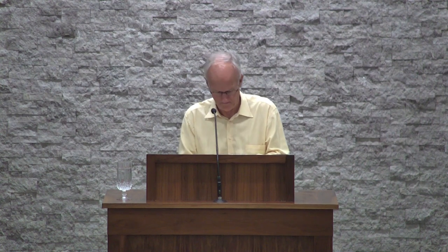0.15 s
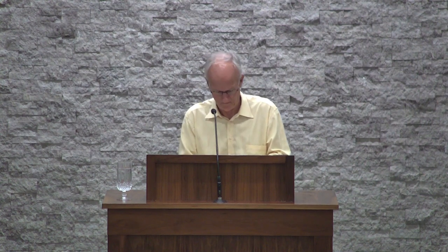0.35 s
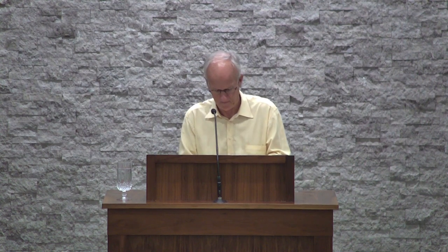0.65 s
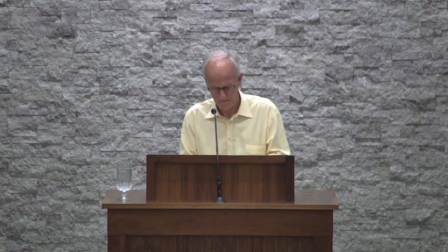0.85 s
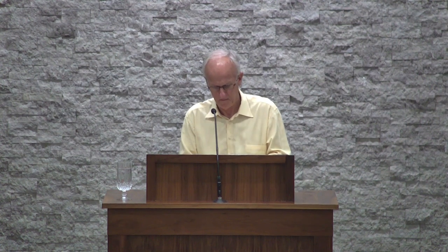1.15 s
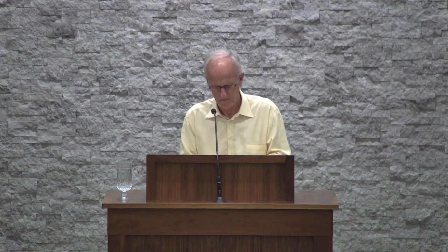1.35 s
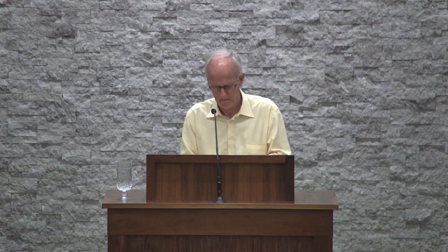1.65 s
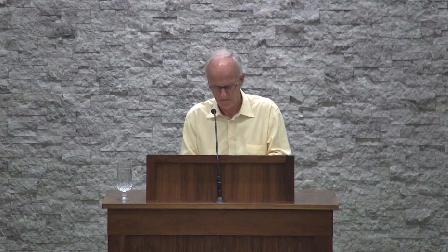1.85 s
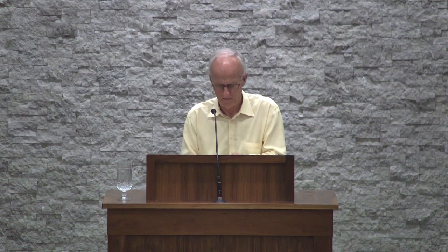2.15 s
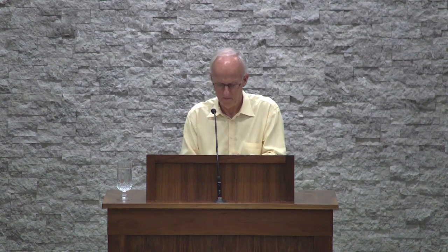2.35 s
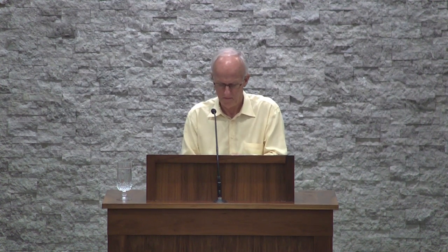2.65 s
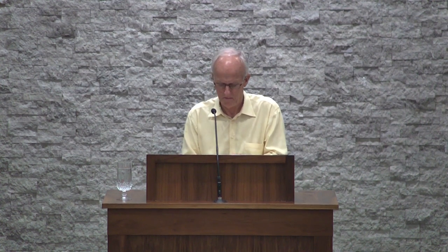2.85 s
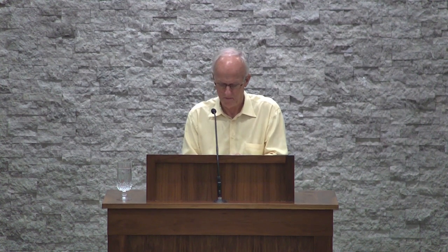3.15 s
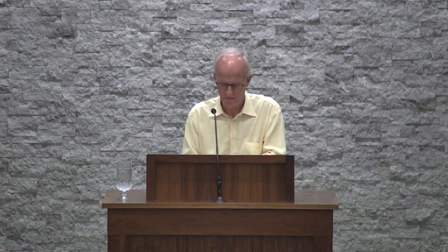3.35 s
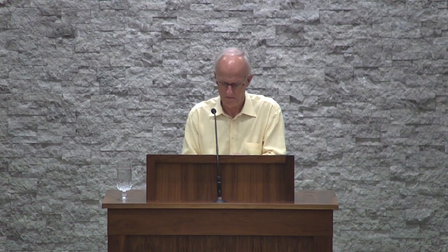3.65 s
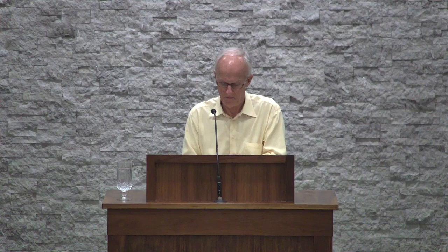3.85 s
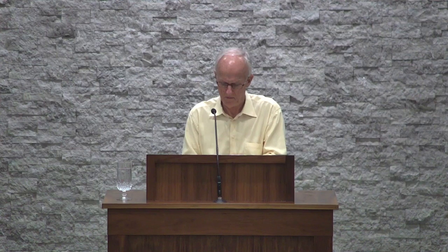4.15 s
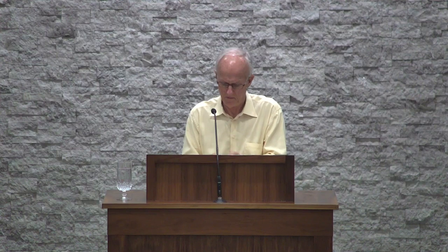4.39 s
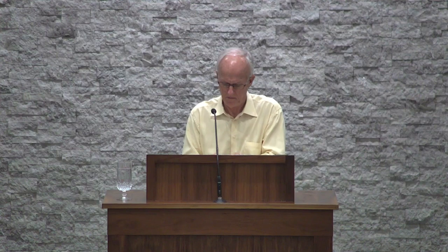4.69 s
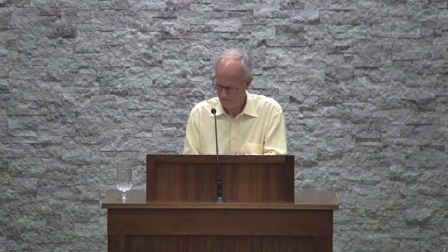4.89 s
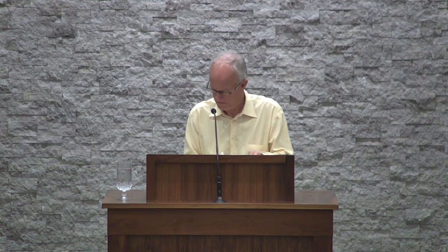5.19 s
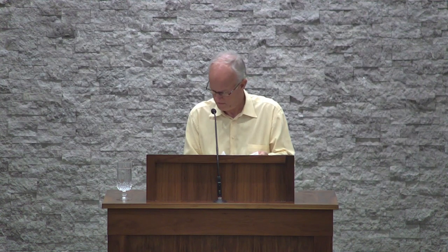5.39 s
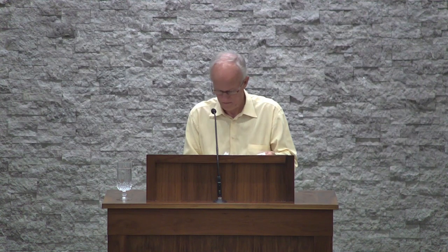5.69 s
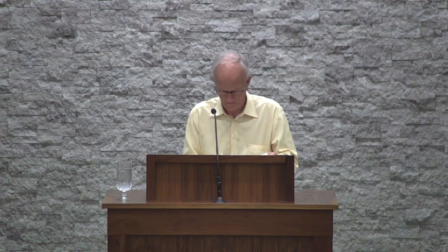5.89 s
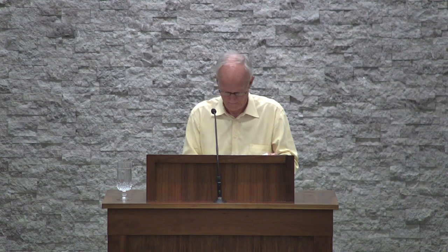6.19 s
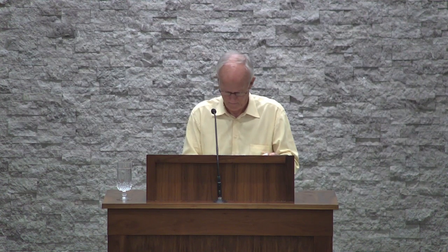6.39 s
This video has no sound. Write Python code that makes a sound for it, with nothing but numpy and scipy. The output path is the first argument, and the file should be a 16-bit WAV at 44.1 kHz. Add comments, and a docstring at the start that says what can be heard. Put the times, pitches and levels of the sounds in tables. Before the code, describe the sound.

Close to the microphone, thin book pages are leafed through on a wooden lectern in a large, quiet hall. From 0 to 0.8 s there are only light rustles and a few isolated snaps, at about 0.2 and 0.6 s. A sharp cluster of crackles with a papery slap comes at 0.9 s, followed by softer crinkling. From about 1.7 s the handling grows busier, with dense crunches and swishes at 2.2 to 2.6 s, then quick irregular snaps through 3 to 3.6 s. After a slightly calmer moment, bright sharp cracks stand out at 4.2, 4.5 and 4.9 s, and a fuller snap with a low thud at 5.0 s. Crinkling continues until about 5.8 s, then fades; a small rustle at 6.1 s and a faint tick at 6.5 s remain. Very faint ventilation rumble, hiss and hum continue throughout, with a thin short room tail.

```python
"""Leafing through thin pages

A book on a wooden lectern in a large hall, close to the microphone. Creases buckle with snaps and
crunches (bursts of micro-cracks); sheets rustle (fluttering, crackling noise through resonances).
Pages slap the book with low thuds (a push and a puff of noise, resonated). A near surface returns a
weak echo, ahead of a thin short tail. Shaped noise gives the ventilation's rumble and faint hiss,
and two wavering sines its hum."""
import sys
import numpy as np
from scipy import signal
from scipy.fft import rfft, irfft, next_fast_len
from scipy.io import wavfile

SR = 44100
rng = np.random.default_rng(int(sys.argv[2]) if len(sys.argv) > 2 else 0)


def master(y):
    """Save y as 16-bit WAV."""
    cut = np.clip(np.atleast_2d(y).T, -1, 1)
    pcm = np.round(cut * 32767)  # scale
    wavfile.write(sys.argv[1], SR, pcm.astype(np.int16))


N = 287950   # length in samples


def from_db(db):
    """Decibels to gain."""
    return 10 ** (np.asarray(db) / 20)


def rms_one(x):
    """Scale to rms 1."""
    return x / np.sqrt(np.mean(x ** 2) + 1e-20)


def coloured(x, spectrum):
    """Give x the spectrum of (f/Hz, level/dB) points, nearly silent outside them; rms 1."""
    size = next_fast_len(len(x))
    hz, level_db = np.transpose(spectrum)
    log_hz = np.log(np.arange(size // 2 + 1) * SR / size + 1)   # + 1 avoids log(0)
    gain = from_db(np.interp(log_hz, np.log(hz), level_db, left=-90, right=-90))
    shaped = irfft(rfft(x, size) * gain, size)
    return rms_one(shaped[:len(x)])


def drift(corner_hz):
    """Slow chance: noise through a double one-pole low-pass; spread 1."""
    r = np.exp(-2 * np.pi * corner_hz / SR)
    noise = rng.standard_normal(N + SR)
    slow = signal.lfilter([1], [1, -2 * r, r * r], noise)
    return rms_one(slow[SR:])   # the first second lets the filter settle


def resonate(x, hz, width_hz):
    """Two-pole resonance, gain 1 on top."""
    r = np.exp(-np.pi * width_hz / SR)
    zeros = np.array([1, 0, -1]) * (1 - r * r) / 2
    poles = [1, -2 * r * np.cos(2 * np.pi * hz / SR), r * r]
    return signal.lfilter(zeros, poles, x)


def edge(x, hz, kind, order):
    """Butterworth high- or low-pass."""
    return signal.sosfilt(signal.butter(order, hz, kind, fs=SR, output="sos"), x)


# spectrum of the background rumble and hiss, closed above 16 kHz: (f/Hz, relative level per Hz/dB)
BACKGROUND_SPECTRUM = [(15, -52), (42, -19.5), (58, -11.5), (80, -18.5), (110, -3.5), (150, -6.5),
                       (230, -3), (300, -10.5), (500, -12), (1200, -20), (2700, -28), (11600, -38.5),
                       (15600, -27), (16100, -45)]
# steady hum tones: (f/Hz, mean level/dB rms, width at half height/Hz)
HUM_TONES = [(188.7, -68, 2), (574.6, -79, 2.49)]
BACKGROUND_DB = -68.5   # rms


def ventilation():
    """Broad rumble and hiss, with narrow hum tones whose pitch and level waver a little."""
    out = from_db(BACKGROUND_DB) * coloured(rng.standard_normal(N), BACKGROUND_SPECTRUM)
    t = np.arange(N) / SR
    for hz, level_db, width_hz in HUM_TONES:
        offset_hz = 0.425 * width_hz * drift(3.01)   # 0.425: spread from width at half height
        wander = 2 * np.pi * np.cumsum(offset_hz) / SR
        level = from_db(level_db + 0.72 * drift(1.1))
        out += level * np.sqrt(2) * np.sin(2 * np.pi * hz * t + wander)
    return out


# sheets kept moving under the fingers: (t/s, rustle level/dB rms)
HANDLING_LEVELS = [(0, -77), (.09, -72), (.32, -65), (.48, -71), (.73, -69.5), (.8, -58), (1.1, -62),
                   (1.22, -70.5), (1.735, -76), (1.75, -54.5), (2.09, -63.5), (2.5, -59.5), (3.34, -63),
                   (3.68, -60.5), (3.76, -56), (4.11, -67), (4.86, -87), (5.26, -59.5), (5.7, -58),
                   (5.84, -71.5), (5.95, -61.5), (6.01, -84), (6.53, -63.5)]
# one sheet sweeping over the next: (peak t/s, peak level/dB rms, swelling/dB per s, fading/dB per s)
SHEET_SWEEPS = [(.03, -67, 244, 197), (.65, -60, 76, 173), (1.13, -53, 73, 222), (1.53, -63.5, 270, 148),
                (1.63, -68, 200, 114), (1.88, -50.5, 115, 64), (2.32, -44.5, 117, 52),
                (2.55, -53.5, 157, 114), (2.859, -47.5, 149, 201), (3.07, -50, 86, 175),
                (3.17, -50.5, 200, 62), (3.419, -46.5, 171, 250), (3.52, -51, 98, 163),
                (3.701, -50.5, 900, 150), (3.73, -61.5, 106, 900), (3.92, -54, 54, 160),
                (4.03, -54.5, 162, 130), (4.159, -53, 228, 67), (4.24, -48, 96, 81), (4.5, -51.5, 112, 114),
                (4.66, -46.5, 291, 127), (4.801, -48, 185, 498), (4.92, -62, 202, 37),
                (5.06, -55.5, 135, 31), (5.37, -50, 154, 54), (5.754, -48.5, 116, 288),
                (6.13, -53.5, 226, 44)]
SWEEP_HOLD_S = 0.0027   # each sweep stays at its peak this long


def sliding():
    """Gain of the rustle: the powers of handling and of sweeps that swell and fade at their own pace."""
    t = np.arange(0, N, 32) / SR   # every 32nd sample is fine enough
    power = from_db(np.interp(t, *np.transpose(HANDLING_LEVELS))) ** 2
    for s, peak_db, swelling, fading in SHEET_SWEEPS:
        before_db = swelling * (s - t)
        after_db = fading * np.maximum(t - s - SWEEP_HOLD_S, 0)
        power += from_db(peak_db - np.where(t < s, before_db, after_db)) ** 2
    return np.interp(np.arange(N) / SR, t, np.sqrt(power))


# parts of the sheet, small creases ringing higher: centre f/Hz
SHEET_PARTS_HZ = [600, 1200, 2200, 3700, 5500, 8000, 11500]
# spectrum of the rustle, closed above 16 kHz: (f/Hz, relative level per Hz/dB)
RUSTLE_SPECTRUM = [(250, 8.5), (500, -5), (1000, -3.5), (2500, -2), (4900, -1.5), (8900, -2), (12600, 1),
                   (15600, -5.5), (16100, -51)]
FLUTTER_DB = 1.5   # all parts of the sheet shake together this much


def rustle(median_per_s, spread_db, crackle_db, clumping_db, patchy_db):
    """Sliding sheets: each part rubs with its own flutter, livelier in the treble, and crackles in clumps."""
    clumps = drift(30.0)
    born = rng.random(N) < median_per_s * from_db(clumping_db * clumps) / SR
    clicks = born * from_db(spread_db * np.minimum(rng.exponential(1, N), 2.5))
    part_of_click = rng.integers(0, len(SHEET_PARTS_HZ), N)
    sheet = np.zeros(N)
    for part, hz in enumerate(SHEET_PARTS_HZ):
        flutter_db = FLUTTER_DB * clumps + patchy_db * min(hz / 2500, 1) * drift(15.6)
        rub = from_db(flutter_db) * rng.standard_normal(N)
        sheet += resonate(rub, hz, 0.74 * hz)
        r = np.exp(-hz / SR / 4.7)   # a crackle lasts a few cycles
        dying = rms_one(signal.lfilter([1], [1, -r], clicks * (part_of_click == part) + 1e-18))
        crackle = from_db(crackle_db) * dying * rng.standard_normal(N)
        sheet += resonate(crackle, hz, 0.82 * hz)
    return sliding() * coloured(sheet, RUSTLE_SPECTRUM)


# creases snapping at once: (peak t/s, peak level/dB rms, low edge f/Hz, high edge f/Hz)
CREASE_SNAPS = [(0.155, -46.5, 400, 6250), (0.2212, -35, 2900, 4630), (0.317, -48.5, 900, 5700),
                (0.5854, -33, 6240, 8700), (0.8725, -37, 1390, 16000), (0.8902, -30.5, 2480, 16000),
                (0.8997, -28.5, 2440, 16000), (0.9037, -28.5, 4500, 14000), (0.909, -36, 2510, 16000),
                (1.012, -40, 2260, 16000), (1.022, -38, 1130, 16000), (1.102, -33.5, 3190, 10000),
                (1.128, -45, 2500, 12000), (1.294, -52.5, 800, 7050), (1.3542, -51, 1130, 6300),
                (1.568, -49, 400, 16000), (1.715, -48, 1130, 16000), (1.744, -41, 800, 16000),
                (1.811, -38, 1420, 16000), (1.9377, -39.0, 3580, 5000), (1.975, -37.5, 1790, 16000),
                (2.019, -35.5, 9000, 12700), (2.1357, -35, 1420, 16000), (2.206, -35.5, 900, 14300),
                (2.211, -38, 5670, 8000), (2.3107, -29, 2010, 16000), (2.344, -34, 8020, 11300),
                (2.3494, -31.5, 9000, 12700), (2.4193, -24, 6200, 8900), (2.445, -33, 8950, 12700),
                (2.484, -36, 9000, 12700), (2.641, -34.5, 1450, 16100), (2.716, -42, 9050, 16000),
                (2.7918, -37.5, 1420, 11300), (2.818, -34, 4470, 6260), (2.9, -40, 2530, 9000),
                (2.911, -42, 5060, 12700), (2.9336, -38, 7150, 10100), (2.963, -38, 6370, 9000),
                (2.974, -26.5, 6200, 16000), (2.9863, -32, 6250, 14300), (2.9953, -43, 9000, 12700),
                (3.0558, -36.5, 1790, 12700), (3.076, -28, 1610, 16000), (3.119, -36, 2010, 16000),
                (3.1476, -32.0, 4010, 16000), (3.206, -35.5, 5030, 7100), (3.2134, -28.5, 4430, 14300),
                (3.264, -38.5, 8020, 11300), (3.3493, -34.5, 1130, 9000), (3.408, -27, 7200, 16000),
                (3.499, -28.5, 3190, 16000), (3.507, -32, 5670, 8000), (3.515, -39, 1420, 16000),
                (3.529, -36, 7240, 10200), (3.5938, -41, 900, 14300), (3.773, -41.5, 800, 9000),
                (3.8118, -41.5, 3130, 4440), (3.9272, -39.5, 2260, 9000), (3.9943, -49, 800, 12700),
                (4.01, -29.5, 1630, 14300), (4.017, -33, 7850, 11300), (4.123, -41.5, 400, 16000),
                (4.133, -33.0, 1460, 7100), (4.1513, -44, 1600, 16000), (4.168, -37, 5030, 7100),
                (4.2127, -18.5, 5960, 16000), (4.2509, -30.5, 9000, 12700), (4.372, -39.0, 9000, 12700),
                (4.432, -38.5, 6370, 9000), (4.461, -38.5, 1790, 16000), (4.4844, -43, 7150, 10100),
                (4.5897, -47, 1420, 12700), (4.608, -47, 900, 7100), (4.6866, -36, 9000, 16000),
                (4.792, -33, 3190, 16000), (4.815, -34, 5000, 7100), (4.898, -22, 3600, 12000),
                (5.0339, -25.5, 620, 8100), (5.0792, -28, 1420, 16000), (5.09, -37, 4510, 6300),
                (5.177, -46, 1600, 10100), (5.2417, -42.0, 9000, 12700), (5.263, -44, 5060, 7100),
                (5.2897, -43, 1130, 16000), (5.301, -38.5, 6370, 9000), (5.313, -40, 7150, 10100),
                (5.3344, -40, 9000, 12700), (5.3561, -27.0, 6960, 10000), (5.424, -41.5, 400, 16000),
                (5.4595, -36.5, 7150, 12700), (5.4772, -31.0, 3560, 14300), (5.4884, -38.0, 8000, 11300),
                (5.5124, -40.0, 1600, 16000), (5.5901, -34.5, 2840, 16000), (5.6402, -39, 9000, 12700),
                (5.6618, -42, 1420, 16000), (6.5208, -40.5, 4600, 6350)]
# creases crunching over a moment:
# (peak t/s, peak level/dB rms, build-up t/s, dying t/s, low edge f/Hz); both times span 60 dB
CREASE_CRUNCHES = [(0.67, -48.5, 0.023, 0.0071, 3420), (0.798, -46, 0.035, 0.0075, 4300),
                   (1.072, -44, 0.11, 0.026, 630), (1.095, -43, 0.0065, 0.0087, 1420),
                   (1.635, -51.5, 0.13, 0.016, 900), (1.856, -40.5, 0.024, 0.021, 2290),
                   (1.8934, -38.5, 0.022, 0.044, 7700), (1.9252, -37, 0.0094, 0.0071, 900),
                   (1.988, -43.5, 0.013, 0.029, 1250), (2.0276, -42, 0.0099, 0.006, 2010),
                   (2.129, -45, 0.014, 0.017, 1420), (2.239, -39, 0.012, 0.086, 1790),
                   (2.247, -34.5, 0.0016, 0.042, 1420), (2.2521, -24.5, 0.008, 0.015, 7200),
                   (2.295, -32.5, 0.023, 0.011, 5640), (2.316, -28, 0.033, 0.012, 6700),
                   (2.337, -29, 0.014, 0.0087, 1700), (2.39, -33.5, 0.016, 0.045, 3030),
                   (2.4, -25.5, 0.0046, 0.0081, 7100), (2.541, -23, 0.015, 0.033, 3240),
                   (2.5556, -37, 0.016, 0.0093, 3470), (2.87, -37, 0.0081, 0.016, 2970),
                   (3.05, -42.5, 0.0053, 0.028, 1270), (3.155, -36.0, 0.015, 0.018, 6370),
                   (3.27, -40, 0.0087, 0.017, 6300), (3.4343, -29.5, 0.0084, 0.0072, 2840),
                   (3.441, -38, 0.014, 0.008, 4000), (3.5988, -43, 0.026, 0.016, 1010),
                   (3.8665, -42.5, 0.0015, 0.031, 8000), (3.8937, -36, 0.0015, 0.036, 3150),
                   (4.2578, -33.5, 0.015, 0.02, 2460), (4.28, -43, 0.0047, 0.0049, 2010),
                   (4.303, -37.5, 0.0092, 0.005, 3500), (4.498, -31.5, 0.0012, 0.017, 6940),
                   (4.6414, -40.5, 0.0015, 0.027, 8020), (4.6553, -33.5, 0.018, 0.035, 3520),
                   (4.676, -37, 0.0062, 0.0078, 1270), (4.714, -41.5, 0.019, 0.016, 1270),
                   (4.7265, -40, 0.012, 0.0069, 1270), (4.7975, -38, 0.012, 0.019, 2290),
                   (5.381, -34.5, 0.0013, 0.025, 5700), (5.597, -36.5, 0.03, 0.0073, 1730)]
SNAP_RISE_S, SNAP_FALL_S = 0.00033, 0.0078   # each spans 60 dB
CRUNCH_TOP_HZ = 12000   # high edge of every crunch
FIRST_CRACK = 7.2   # push added at a crease's peak, against cracks of spread 1 before roughening
BROAD_HZ, PAPER_TOP_HZ = 1500, 15000   # every crease sounds faintly over this whole span
BRIGHTENING = 0.33   # thin paper radiates treble better: share of each sample taken from the next


def snaps(broad_db, roughness_db):
    """Each crease builds up and dies as a burst of uneven micro-cracks, strongest in its own band."""
    size, lead = 3072, 1024   # samples per burst, samples before its peak
    out = np.zeros(N + size)
    t = (np.arange(size) - lead) / SR
    creases = [(s, peak_db, SNAP_RISE_S, SNAP_FALL_S, low_hz, high_hz)
               for s, peak_db, low_hz, high_hz in CREASE_SNAPS]
    creases += [(*row, CRUNCH_TOP_HZ) for row in CREASE_CRUNCHES]
    cracks = rng.standard_normal((len(creases), 2, size))
    for (s, peak_db, rise, fall, low_hz, high_hz), (fine, uneven) in zip(creases, cracks):
        shape = from_db(-60 * np.where(t < 0, -t / rise, t / fall))
        burst = fine * from_db(roughness_db * uneven) * shape + FIRST_CRACK * (t == 0)
        burst = edge(burst, PAPER_TOP_HZ, "low", order=2)
        burst = signal.lfilter([1, -BRIGHTENING], [1], burst)
        own = edge(burst, low_hz, "high", order=4)   # small creases radiate no bass
        own = edge(own, high_hz, "low", order=2)
        bright = own + from_db(broad_db) * edge(burst, BROAD_HZ, "high", order=2)
        # same energy as plain noise of the listed peak rms under this shape
        level = from_db(peak_db) * np.linalg.norm(shape) / np.linalg.norm(bright)
        at = round(s * SR) - lead
        out[at:at + size] += level * bright
    return out[:N]


# pages slapping the book on the lectern: (t/s, peak level/dB, centre f/Hz)
PAGE_SLAPS = [(0.2211, -37, 1500), (.337, -48.5, 1210), (0.873, -33.5, 2050), (1.068, -44.5, 480),
              (1.924, -57, 1670), (2.252, -36, 1030), (2.315, -42.5, 462), (2.336, -52, 1100),
              (2.397, -40, 980), (2.542, -37, 1010), (2.72, -50, 506), (3.35, -35.5, 1820),
              (3.995, -45, 890), (4.666, -48.5, 470), (5.034, -44, 654), (5.079, -57, 1400),
              (5.149, -50, 825), (5.329, -52, 494), (5.425, -44, 845)]


def knocks(t60_s, push):
    """A slap is one push plus a short puff of noise in a low resonance of book and wood."""
    size = 2048
    out = np.zeros(N + size)
    dying = from_db(-60 * np.arange(size) / SR / t60_s)
    puffs = rng.standard_normal((len(PAGE_SLAPS), size))
    for (s, peak_db, hz), puff in zip(PAGE_SLAPS, puffs):
        blow = puff * dying + push * signal.unit_impulse(size)
        thud = resonate(blow, hz, 0.19 * hz)
        thud = resonate(thud, hz, 12.3 * hz)   # very wide
        at = round(s * SR)
        out[at:at + size] += from_db(peak_db) * thud / np.abs(thud).max()
    return out[:N]


# echo from a near surface: (delay t/s, level/dB)
NEAR_ECHOES = [(0.012, -21.5)]
HALL_DB, HALL_T60_S = -17, 0.21   # whole tail before its treble is softened; time to fall 60 dB


def hall(x):
    """A weak early echo, then a thin diffuse tail, both softened in the treble."""
    t = np.arange(SR) / SR
    tail = rng.standard_normal(SR) * from_db(-60 * t / HALL_T60_S) * (t > .015)
    response = from_db(HALL_DB) * tail / np.linalg.norm(tail)
    for delay_s, level_db in NEAR_ECHOES:
        response[round(delay_s * SR)] += from_db(level_db)
    wet = signal.fftconvolve(x, response)[:N]
    return edge(wet, 9000, "low", order=1)


def scene():
    """Pages close by, their echo and tail, and the background of the hall."""
    pages = snaps(broad_db=-27.5, roughness_db=5) + knocks(t60_s=0.013, push=2.0)
    pages += rustle(median_per_s=450, spread_db=8.0, crackle_db=0.5, clumping_db=4.5, patchy_db=4.5)
    return (pages + hall(pages) + ventilation())[None]


CUTOFF_HZ = 16900   # 70 dB down from here up


def record(dry):
    """The last treble is softened, then the top is cut steeply."""
    soft = edge(dry, 15900, "low", order=4)
    return signal.sosfilt(signal.cheby2(14, 70, CUTOFF_HZ, fs=SR, output="sos"), soft)


dry = scene()
out = record(dry)
master(out)
```